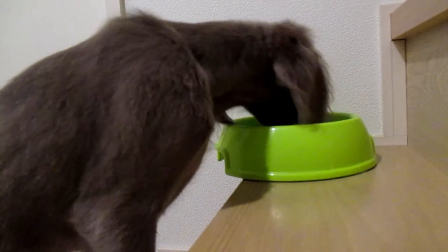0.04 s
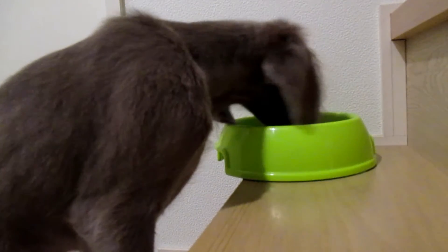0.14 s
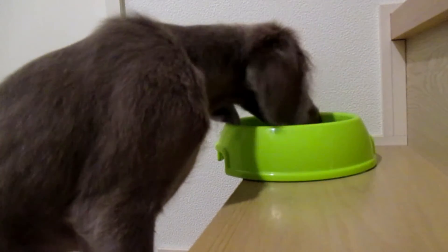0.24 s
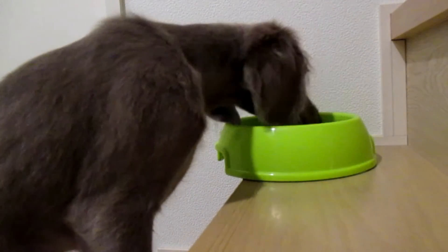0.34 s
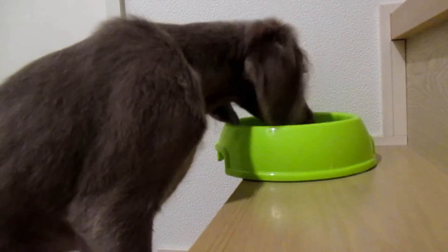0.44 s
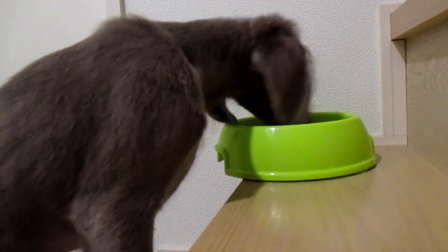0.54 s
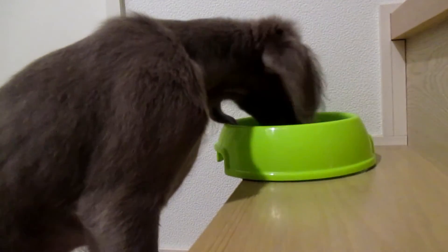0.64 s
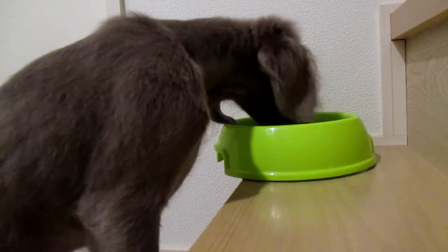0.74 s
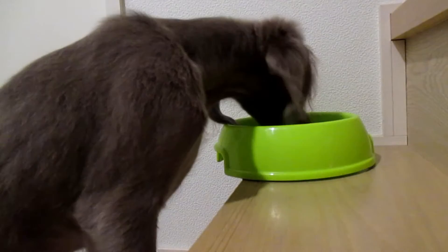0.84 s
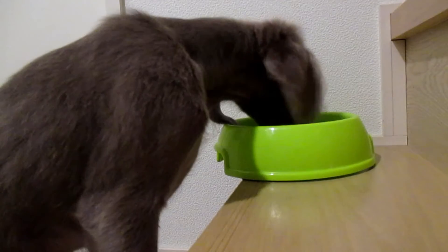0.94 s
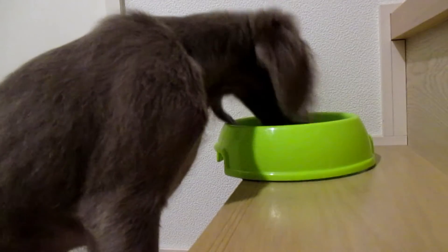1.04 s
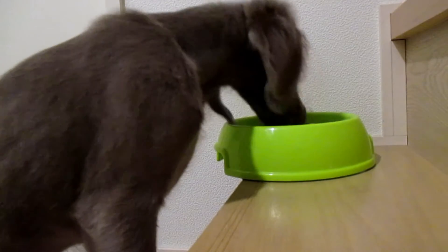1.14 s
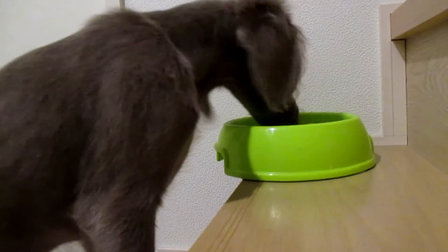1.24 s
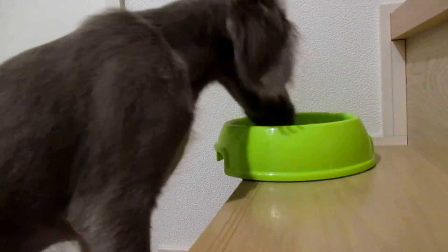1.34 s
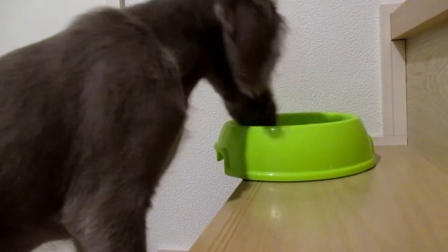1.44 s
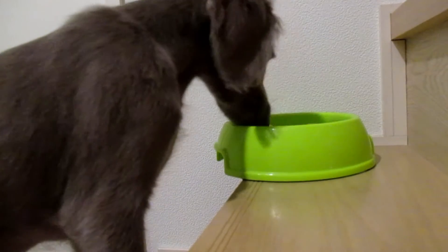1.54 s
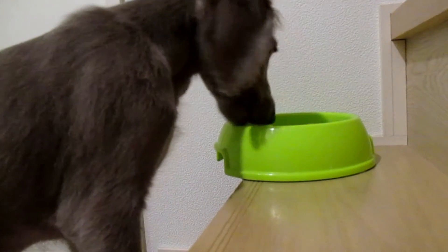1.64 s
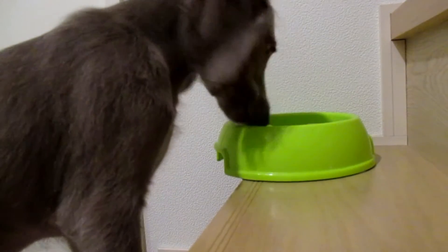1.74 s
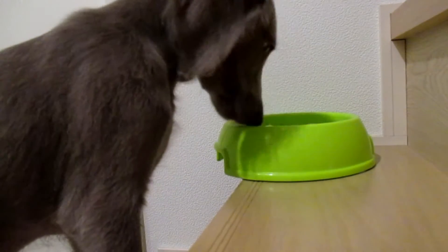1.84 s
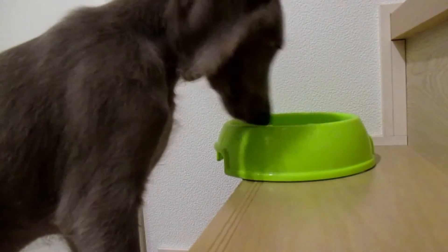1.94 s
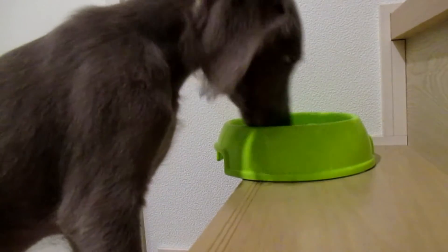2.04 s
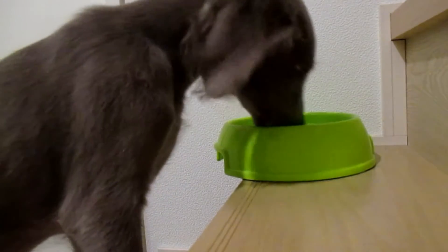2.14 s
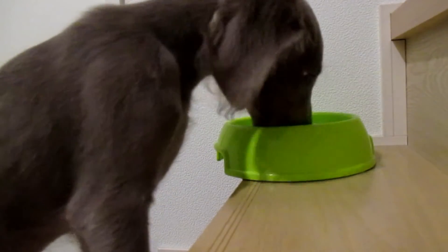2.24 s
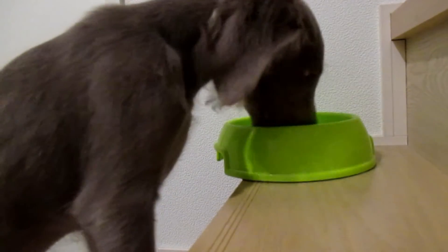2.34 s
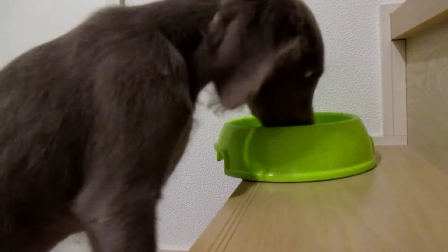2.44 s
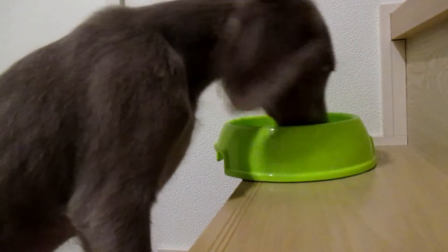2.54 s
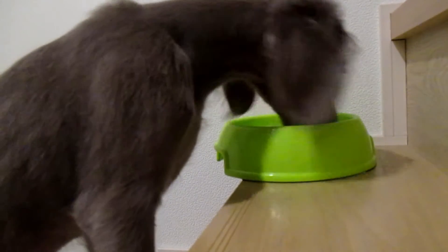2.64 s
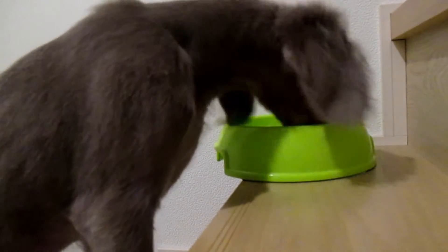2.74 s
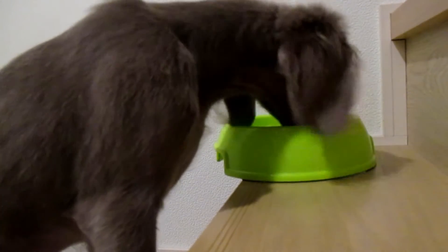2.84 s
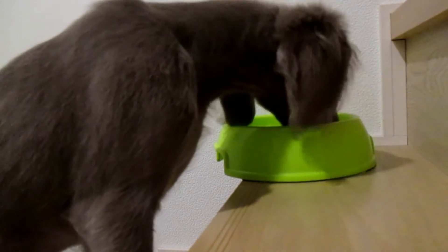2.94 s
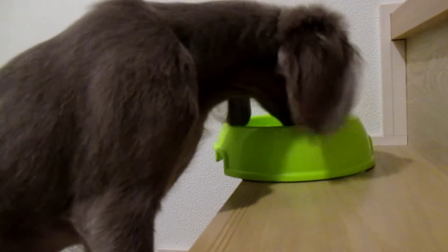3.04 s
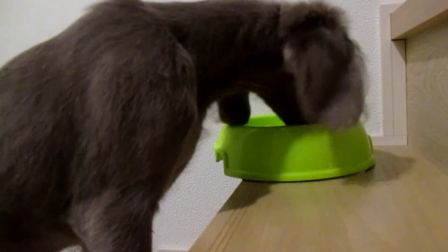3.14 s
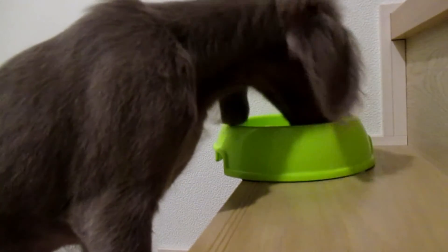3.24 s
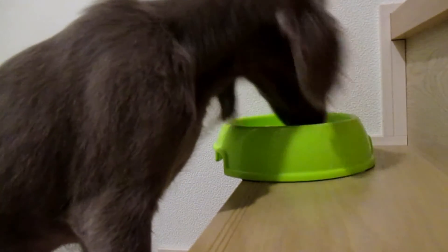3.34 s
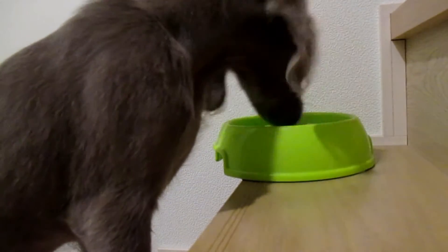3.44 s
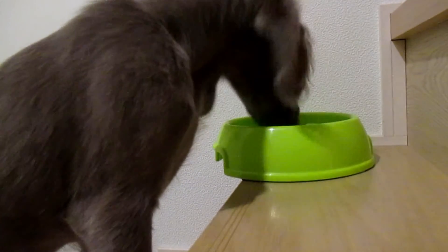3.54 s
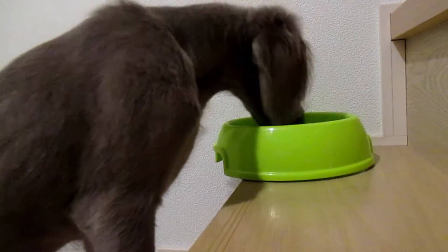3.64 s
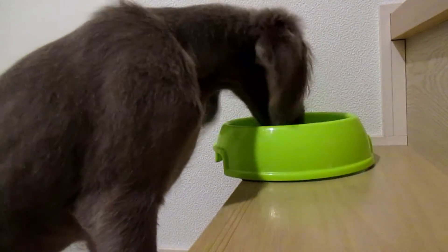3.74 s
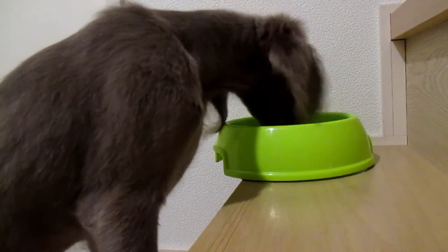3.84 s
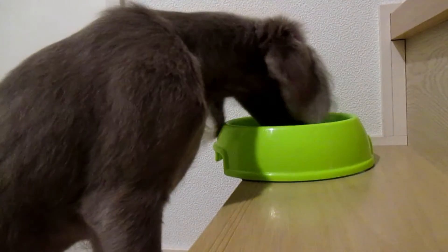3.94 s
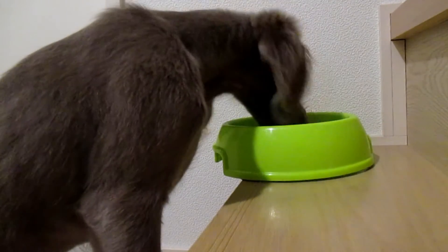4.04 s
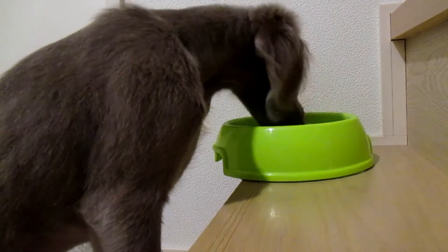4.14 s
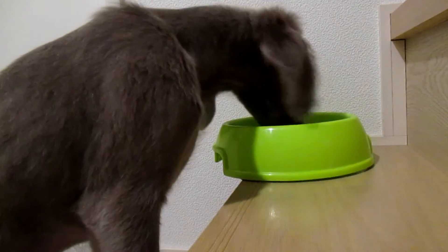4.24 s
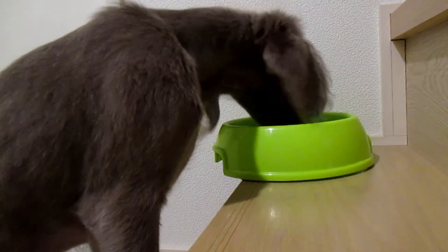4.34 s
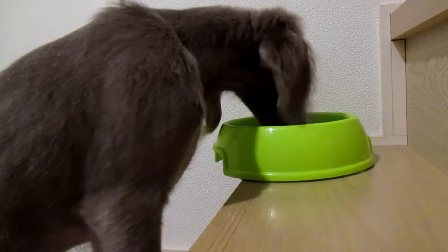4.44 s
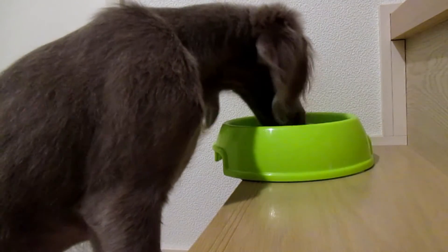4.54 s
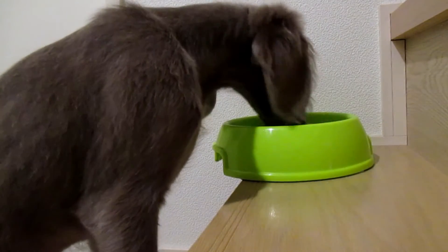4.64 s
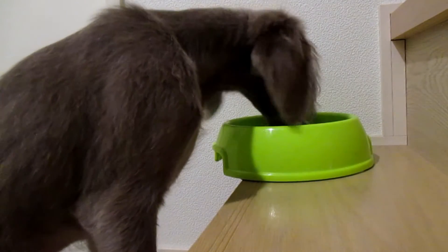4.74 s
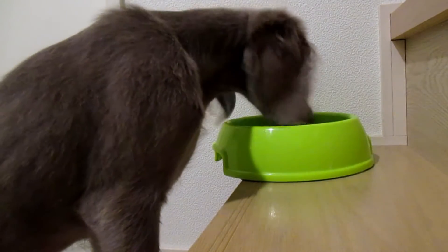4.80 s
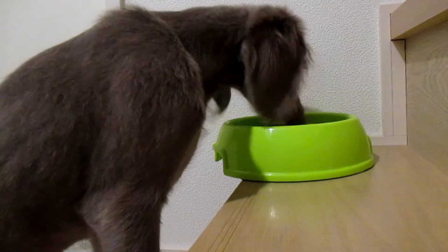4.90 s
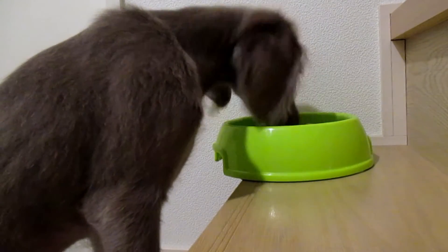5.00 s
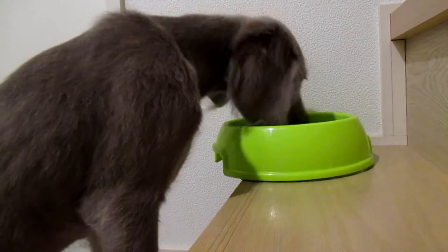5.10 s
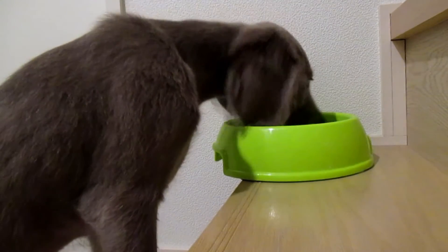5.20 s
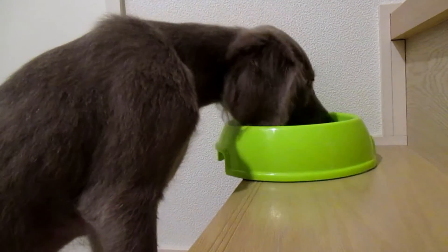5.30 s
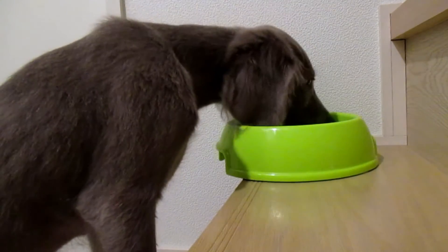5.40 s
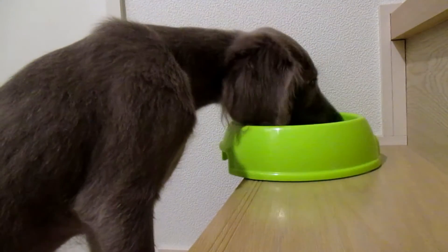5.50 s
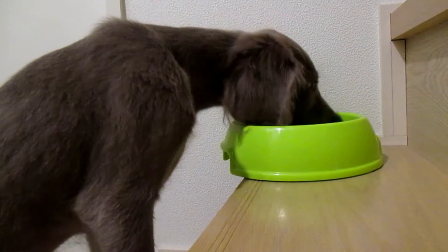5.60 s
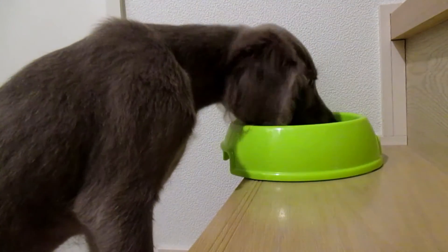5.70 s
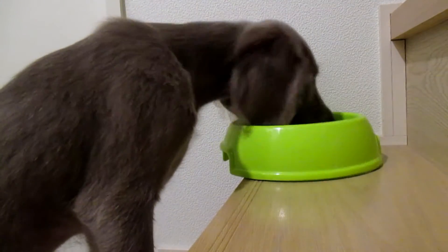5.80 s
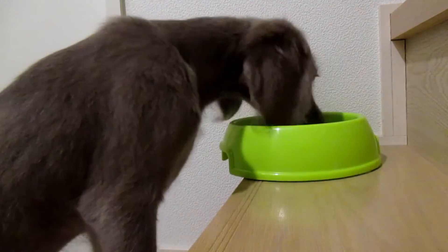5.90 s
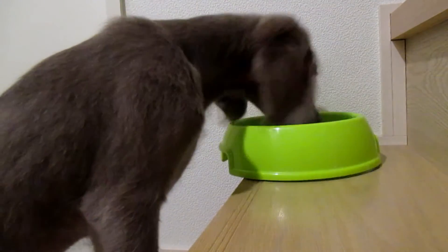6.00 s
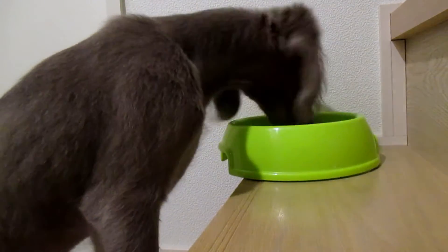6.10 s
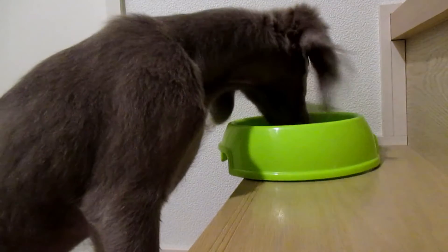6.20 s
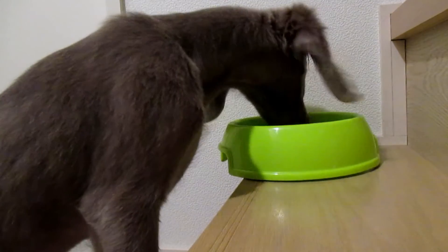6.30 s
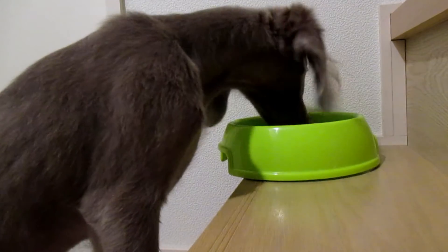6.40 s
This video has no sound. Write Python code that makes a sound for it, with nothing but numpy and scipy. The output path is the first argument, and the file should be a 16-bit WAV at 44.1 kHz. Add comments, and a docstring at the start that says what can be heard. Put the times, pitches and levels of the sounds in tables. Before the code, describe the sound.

Heard close in a small hard room, a dog noses through dry kibble, clacking pieces against a plastic bowl that knocks on wood. A quieter spell of soft tongue smacks follows, then a burst of loud brittle crunches, then more rummaging with isolated cracks and increasingly heavy hollow knocks. A low, soft indoor hum and faint hiss stay beneath.

```python
"""Dry kibble cracks between a dog's teeth: bursts of splinter noise, each with a pitch, answered by a small hard room.
The muzzle knocks a plastic bowl onto a wooden shelf and pieces clack on its wall: struck banks of decaying modes.
Tongue and lips smack as blurred pitches; loose pieces roll and patter as random taps through resonances.
A soft indoor hum of coloured noise lies beneath."""
import sys
import numpy as np
from scipy import signal
from scipy.fft import rfft, irfft, next_fast_len
from scipy.io import wavfile
from scipy.ndimage import uniform_filter1d

SR = 44100
rng = np.random.default_rng(int(sys.argv[2]) if len(sys.argv) > 2 else 0)


def store_pcm(level_fs):
    """Save levels as 16-bit WAV."""
    pcm = np.round(np.clip(level_fs, -1, 1) * 32767).astype(np.int16)
    wavfile.write(sys.argv[1], SR, np.atleast_2d(pcm).T)


N = 284886

# knocks of bowl on board, relative levels: start_s, level_db, deep_modes_db, upper_modes_db, ring_db
KNOCK_EVENTS = [(0.017, -31.5, -11.5, -7, -1.5), (0.23, -47, 7, -9, 1.5), (0.315, -34.5, 2.5, -6, -1.5),
                (0.401, -25.5, -19, -9, -8), (0.541, -16.5, -13, -10.5, -1), (0.589, -25.5, -9.5, -10, 2),
                (0.743, -21.5, -17.5, -10, 3.5), (0.799, -33, -18, -15, 3.5), (0.928, -25, -19, -12, 1),
                (0.968, -31, -6, -19, 3), (1.096, -20, -50, -13.5, -0.5), (1.162, -28, -5.5, -22, 6.5),
                (1.395, -31, 2.5, -9, -2), (1.805, -42, 5.5, -18, 0), (2.386, -33, 7, -7, 1),
                (2.423, -42, 1.5, 2, 8), (2.708, -38.5, 6.5, -4, 1.5), (2.841, -39, 8.5, 2, 1),
                (2.959, -32, -1, -16, 4.5), (3.031, -20.5, -1, -14, -1), (3.045, -27.5, -20, -17, 4.5),
                (3.303, -32.5, -1, -12, -1.5), (3.603, -28, -27, -15, -10.5), (3.694, -11, -26, -13, -4.5),
                (3.993, -15, -0.5, -9, 1.5), (4.009, -15, -14.5, -19, 2.5), (4.066, -15.5, -21, -19, 1),
                (4.326, -17, -42, -8.5, -3), (4.449, -23, -22, -17, -5), (4.633, -34.5, -1, 1, -3),
                (5.148, -9.5, -37, -9, -2), (5.268, -21, -5.5, -17, 3.5), (5.584, -22.5, -3.5, -8, 6),
                (5.613, -9.5, -6.5, -14.5, -1), (5.879, -5, -25, -3.5, -3), (5.921, -10.5, -0.5, -9, -4.5),
                (6.024, -22.5, -22, -13, -2), (6.07, -7.5, -16, -6, -4.5), (6.276, -21.5, -18, -9, 1.5)]
# modes of board and bowl together: pitch_hz, level_db, t60_s
BOARD_MODES = [(102, -8, .5), (130, -8, .5), (155, -2, .8), (186, -5, .4), (240, 0, .4), (278, -2, .4),
               (312, -5, .4), (371, -2, .38), (400, -7, .35), (428, -1, .38), (477, -1, .42),
               (515, -10, .3), (572, -6, .25), (601, -2, .25), (682, -9, .2), (742, -2, .4), (780, 0, .36),
               (824, -3, .3)]
# modes of the bowl wall: pitch_hz, level_db, t60_s
WALL_MODES = [(912, 0.5, 0.62), (995, 3, 0.28), (1095, 3, 0.13), (1128, -8, 0.73), (1213, -0.5, 0.15),
              (1310, 0.5, 0.22), (1395, -1.5, 0.22), (1522, -3.5, 0.38), (1565, 3, 0.12),
              (1674, -0.5, 0.29), (1846, -1.5, 0.18)]


def amp(db):
    """Gain of a level in dB."""
    return np.exp(np.asarray(db) * np.log(10) / 20)


def unit(x):
    """x at rms 1."""
    return x / np.sqrt(np.mean(x ** 2) + 1e-20)


def along(points, hz):
    """Interpolates (Hz, value) points on a log frequency axis."""
    point_hz, value = np.transpose(points)
    return np.interp(np.log(hz + 1), np.log(point_hz + 1), value)


def filtered(x, response):
    """x times a response of frequency, padded against wrap-around."""
    m = next_fast_len(N + SR // 2)
    return irfft(rfft(x, m) * response(np.fft.rfftfreq(m, 1 / SR)), m)[..., :N]


def add(track, start_s, sound):
    """Mixes a sound into the track at start_s."""
    part = track[round(start_s * SR):][:len(sound)]
    part += sound[:len(part)]


def struck(modes, gains_db, ring_db, thud_t60_s, attack_s, swell_s, knots_per_s, length_s):
    """One blow: each mode thuds, then its ring comes back off the walls with wandering strength and phase."""
    hz, db, t60_s = np.transpose(modes)[:, :, None]
    t = np.arange(round(length_s * SR)) / SR
    knots = rng.standard_normal((len(modes), 90)) + 1j * rng.standard_normal((len(modes), 90))
    knots = knots / np.sqrt(np.abs(knots))  # phase wanders freely, strength less
    wander = np.array([np.interp(t * knots_per_s, np.arange(len(k)), k) for k in knots])
    turn = np.exp(2j * np.pi * hz * t)
    thud = amp(-60 * t / thud_t60_s) * turn.imag
    swell = 1 - np.exp(-t / swell_s)
    ring = amp(ring_db - 60 * t / t60_s) * (turn * wander).imag * swell
    attack = (1 - np.exp(-t / attack_s)) ** 2
    return np.sum(amp(db + gains_db[:, None]) * (thud + ring), axis=0) * attack


def bite(f):
    """Colour of breaking kibble: a broad curve times resonances of the air inside the bowl."""
    # broad colour: pitch_hz, gain_db
    colour = [(1120, -14), (1900, -4.5), (2060, -14.5), (2410, 1), (3130, -1.5), (3390, -2), (4120, 0),
              (5170, -4), (7220, -12), (9150, -17.5), (15500, -38)]
    # air resonances: pitch_hz, half_width_hz, gain_db
    hollow = [(2630, 49, 2.5), (3010, 7.7, 10.5), (3360, 38, 7), (4650, 70, -0.5)]
    lifts = []
    for centre_hz, half_width_hz, db in hollow:
        damping = 2j * f * half_width_hz
        lifts.append(1 + (amp(db) - 1) * damping / (centre_hz ** 2 - f * f + damping))
    return amp(along(colour, f)) * np.prod(lifts, axis=0)


def cracks():
    """Each break is a few ms of splinters and a pitch of its own; the room's echo dies band by band."""
    # pieces that break or tick, relative levels: start_s, level_db, top_octave_db, pitch_hz, echo_db
    crack_events = [(0.0435, -35, -17, 3040, -33), (0.3177, -41.5, 2.5, 3640, -10),
                    (0.3486, -35, -12, 3080, -11), (0.3626, -36, -13, 2980, -25),
                    (0.404, -16, -21, 2680, -12.5), (0.4294, -19, -27, 2680, -17),
                    (0.5546, -26.5, -23.5, 3220, -9.5), (0.7223, -45.5, 3, 4170, -12),
                    (0.741, -30, -18, 2910, -17), (0.792, -31, -6, 2920, -12),
                    (0.8574, -30, -20, 2270, -17), (0.9401, -31, -9.5, 4170, -12.5),
                    (0.9933, -27, -22, 3420, -10.5), (1.1368, -43, -2, 2420, -12),
                    (1.1663, -28.5, -38, 2550, -25), (1.2381, -27.5, -20.5, 2480, -12.5),
                    (1.4408, -34, -9.5, 3730, -14.5), (1.6182, -41.5, 1, 3200, -14),
                    (1.706, -41, -13, 4670, -7), (1.722, -38, -4, 2420, -14),
                    (2.2104, -40.5, -3, 2960, -13), (2.2324, -42, 0, 2870, -18),
                    (2.2458, -43, 6, 5350, -17), (2.2886, -19, -20, 4300, -9.5),
                    (2.3304, -35, -4, 4270, -13), (2.385, -15.5, -23, 3720, -13),
                    (2.4126, -17, -17, 3720, -13), (2.4385, -21.5, -22, 4650, -19),
                    (2.4769, -11.5, -28.5, 4060, -15.5), (2.5073, -23.5, -14.5, 3140, -11),
                    (2.613, -35, -19, 3710, -6), (2.6504, -38.5, -11, 4280, -5),
                    (2.6938, -13, -26, 2590, -19), (2.698, -5.5, -12.5, 4650, -13),
                    (2.7617, -15.5, -22, 3940, -12), (2.7942, -1.5, -16.5, 3220, -12),
                    (2.8205, -24, -12, 3030, -21), (2.9489, -5, -12, 2550, -13),
                    (3.044, -16, -37, 3640, -11), (3.0583, -17, -29, 2630, -12),
                    (3.1113, -14, -32, 3980, -11.5), (3.2766, -20, -31, 2910, -14),
                    (3.5858, -41.5, -6, 4310, -12), (3.605, -36, -18, 2730, -13),
                    (3.694, -30.5, -18, 2470, -23), (3.7858, -37.5, -16, 2630, -15),
                    (3.864, -30.5, -13, 3300, -10.5), (3.9015, -15, -36, 3300, -17),
                    (3.9693, -24.5, -21, 2780, -16), (3.9943, -32, -28, 2280, -5),
                    (4.0677, -34, -12, 2700, -9.5), (4.1415, -53.5, 13, 3460, -16),
                    (4.2348, -32.5, -4, 4870, -9), (4.2533, -5, -20.5, 2940, -11.5),
                    (4.431, -37, -22, 2400, -6), (4.5523, -37.5, -7, 5280, -13),
                    (4.7814, -46, -10, 2480, -2), (4.7985, -36, -25, 3620, -15),
                    (5.089, -60, 13, 2410, -18), (5.149, -36, -36, 2730, -13),
                    (5.2716, -38.5, -14, 3340, -2), (5.3149, -32.5, -17, 3270, -1),
                    (5.4875, -33, -17, 3480, -10), (5.5144, -35, -16, 3430, -4),
                    (5.5551, -16.5, -12, 3160, -8.5), (5.743, -29, -24, 3420, -18),
                    (5.819, -33, -25, 4160, -17), (5.878, -28, -28, 2250, -11),
                    (5.896, -30, -18.5, 3360, -8), (5.929, -18, -35, 3140, -16),
                    (5.9945, -12, -45, 3060, -19), (6.0214, -22.5, -42, 2830, -12),
                    (6.1324, -39.5, -2, 2740, -17), (6.285, -37, -12, 2590, -12.5),
                    (6.3924, -28.5, -22, 2950, -29)]
    # echo bands: centre_hz, t60_s
    echo_bands = [(3200, 0.39), (5500, 0.36), (8500, 0.37), (12500, 0.14)]
    ring_db, ring_per_top = -24, 0.28  # dull cracks ring more: dB gained per dB of top octave lost
    noise_db = -1.5
    t = np.arange(round(.4 * SR)) / SR
    burst_t = t[:2000]
    burst_power, echo_power = np.zeros((len(echo_bands), N)), np.zeros((len(echo_bands), N))
    pings = np.zeros(N)
    for s, db, top_db, hz, echo_db in crack_events:
        for k, (centre_hz, t60_s) in enumerate(echo_bands):
            level_db = db + (top_db + 21 if centre_hz > 6000 else 0)
            burst = amp(level_db - 60 * burst_t / 0.026) ** 2 * (1 - np.exp(-burst_t / 0.00009))
            echo = amp(level_db + echo_db - 60 * t / t60_s) ** 2 * (1 - np.exp(-t / 0.0047))
            add(burst_power[k], s, burst)
            add(echo_power[k], s, echo)
        ping = struck([(hz, -6, .3)], np.array([db]), ring_db - ring_per_top * top_db, thud_t60_s=0.027,
                      attack_s=0.00053, swell_s=0.0054, knots_per_s=417, length_s=0.28)
        add(pings, s, ping)
    # uneven single fractures, 3500 a second
    splinters = unit((rng.random(N) < 3500 / SR) * amp(3.5 * rng.standard_normal(N)))
    # echo strength flickers over about 3 ms
    flutter = amp(1.6 * unit(uniform_filter1d(rng.standard_normal(N), size=130)))
    centres_hz = np.transpose(echo_bands)[0]
    out = pings
    for k in range(len(echo_bands)):
        in_band = np.arange(len(echo_bands)) == k
        share = lambda f: np.sqrt(np.interp(f, centres_hz, in_band)) * bite(f)
        strength = np.sqrt(burst_power[k]) * splinters + np.sqrt(echo_power[k]) * flutter
        out = out + amp(noise_db) * filtered(strength * rng.standard_normal(N), share)
    return out


def board():
    """Knocks of bowl on board: landing spot sets the share of deep modes, the deepest grow slowly with force."""
    deepest_db, deepest_growth = -25, 0.35  # level at a -27.5 dB knock, dB per dB of knock
    trim_db = -5.5
    out, hz = np.zeros(N), np.transpose(BOARD_MODES)[0]
    swell_s = np.where(hz > 700, .035, .007)[:, None]  # the highest modes build up after the blow
    for s, db, deep_db, upper_db, ring_db in KNOCK_EVENTS:
        deepest = deepest_db + deepest_growth * (db + 27.5)
        gains_db = np.select([hz < 210, hz < 330, hz > 545], [deepest, db + deep_db + 4, db + upper_db], db)
        knock = struck(BOARD_MODES, gains_db, ring_db, thud_t60_s=0.034, attack_s=0.00055,
                       swell_s=swell_s, knots_per_s=20.2, length_s=0.26)
        add(out, s, amp(trim_db) * knock)
    # a small board radiates no deep bass
    return filtered(out, lambda f: (1j * f / (85 + 1j * f)) ** 2)


def wall():
    """Clacks of hard pieces on the plastic: each lifts the wall modes near its favoured pitch."""
    # pieces that hit the wall, relative levels: start_s, level_db, favoured_pitch_hz, ring_db
    clack_events = [(0.042, -32, 990, -22), (0.318, -34.5, 1030, -6), (0.351, -27.5, 1570, -12),
                    (0.403, -8.5, 837, -9.5), (0.541, -30, 1560, -3.5), (0.742, -16.5, 1250, -14),
                    (0.793, -25, 820, -9), (0.85, -23.5, 1640, -14), (0.946, -31, 1000, -11),
                    (0.993, -33, 1110, -8), (1.141, -32.5, 1630, -14), (1.236, -22, 1160, -14),
                    (1.281, -33, 1010, -12), (1.444, -32.5, 1170, -14), (1.533, -39, 896, -9),
                    (2.29, -19.5, 1370, -11), (2.389, -28, 1840, 1.5), (2.699, -28, 1770, -2.5),
                    (2.76, -20, 1080, -21), (2.793, -20.5, 1044, -5), (2.953, -26, 1290, -8),
                    (3.044, -25.5, 1060, -4), (3.111, -25.5, 1570, -9.5), (3.22, -36.5, 1550, -6),
                    (3.272, -30, 1720, -3.5), (3.602, -30, 1150, 0.5), (3.694, -23.5, 870, -13),
                    (3.898, -32, 1860, -4), (3.992, -24, 1180, -4.5), (4.066, -17.5, 934, -12.5),
                    (4.12, -40, 860, -9), (4.253, -19, 1240, -7), (4.33, -25.5, 890, -8),
                    (4.379, -29.5, 884, -11), (4.43, -29, 1830, -8), (5.151, -20.5, 1540, -7.5),
                    (5.206, -29, 890, -10), (5.488, -37, 886, -9), (5.517, -26, 890, -11),
                    (5.556, -26.5, 1530, -13), (5.587, -25, 1050, -16), (5.611, -31.5, 890, 1),
                    (5.665, -33, 872, -18), (5.881, -10.5, 1080, -6), (5.992, -19.5, 940, -14),
                    (6.07, -17, 960, -9), (6.128, -39, 890, -8), (6.212, -40, 940, -4),
                    (6.39, -26.5, 960, -24)]
    favour_db, favour_half_width_hz = 9.5, 55
    trim_db = -11.5
    out, hz = np.zeros(N), np.transpose(WALL_MODES)[0]
    for s, db, favoured_hz, ring_db in clack_events:
        gains_db = db + favour_db / (1 + ((hz - favoured_hz) / favour_half_width_hz) ** 2)
        clack = struck(WALL_MODES, gains_db, ring_db, thud_t60_s=0.038, attack_s=0.00053,
                       swell_s=0.00045, knots_per_s=89.6, length_s=.3)
        add(out, s, amp(trim_db) * clack)
    return filtered(out, lambda f: (1j * f / (500 + 1j * f)) ** 2)


def smacks():
    """Soft wet smacks of tongue and lips: the mouth cavity sounds briefly as a blurred pitch."""
    # smacks, relative levels: start_s, level_db, pitch_hz
    smack_events = [(1.375, -37.5, 1770), (1.534, -43.5, 1720), (1.6563, -41, 1730), (1.7502, -38, 1630),
                    (2.2172, -34.5, 1685), (4.5516, -38, 1690), (4.7889, -43, 1710), (4.8216, -30, 1727),
                    (5.7984, -48, 1640), (6.2158, -36, 1520)]
    t60_s = 0.17
    out = np.zeros(N)
    for s, db, hz in smack_events:
        smack = struck([(hz, -3, t60_s)], np.array([db]), -0.71, thud_t60_s=0.043, attack_s=0.0007,
                       swell_s=0.0044, knots_per_s=343, length_s=.25)
        add(out, s, smack)
    return out


def rolling(modes, per_second, spread_db):
    """Sparse random taps through the resonances of an object, rms 1."""
    taps = (rng.random(N) < per_second / SR) * amp(spread_db * rng.standard_normal(N)) * rng.standard_normal(N)

    def body(f):
        """Sum of resonances with alternating sign."""
        total = 0
        for k, (centre_hz, db, t60_s) in enumerate(modes):
            damping = 1j * f * 7.7 / t60_s  # 3.5 times the width that t60_s alone gives
            total = total + (-1) ** k * amp(db) * damping / (centre_hz ** 2 - f * f + damping)
        return total

    return unit(filtered(taps, body))


def stir():
    """Loose pieces roll under the tongue on wall and board, crumbs patter, the bowl chatters after knocks."""
    # loose kibble rolling along the wall: time_s, level_db
    roll_levels = [(0.0, -64), (0.32, -57), (0.5, -48), (1.35, -51.5), (1.94, -89), (2.23, -55.5),
                   (2.39, -43), (3.0, -52), (3.44, -58.5), (3.65, -66), (3.78, -51), (4.25, -65),
                   (4.95, -55), (5.18, -71), (5.34, -51.5), (6.08, -47.5), (6.37, -56), (6.46, -73)]
    # patter of crumbs: time_s, level_db
    crumb_levels = [(0.0, -53.5), (0.36, -90), (0.5, -56), (0.59, -57.5), (1.89, -71), (2.27, -69),
                    (2.45, -60), (2.75, -64), (2.88, -51), (3.0, -46), (3.38, -65), (4.39, -58),
                    (4.89, -72), (5.2, -67), (5.49, -66), (5.99, -55.5), (6.15, -63), (6.46, -80)]
    board_db = -9.5  # rolling heard through the board, relative to the wall
    chatter_db, chatter_peak_s = -24.5, 0.043  # relative to the knock's table level; time to its height
    t = np.arange(N) / SR
    level = lambda rows: amp(np.interp(t, *np.transpose(rows)))
    ticks = (rng.random(N) < 1500 / SR) * amp(1.5 * rng.standard_normal(N)) * rng.standard_normal(N)
    crumbs = unit(filtered(ticks, bite))
    board_level = amp(board_db) * level(roll_levels)
    u = t[:SR // 2] / chatter_peak_s
    for s, db, *_ in KNOCK_EVENTS:
        add(board_level, s, amp(db + chatter_db) * u * np.exp(1 - u))
    on_wall = level(roll_levels) * rolling(WALL_MODES, per_second=900, spread_db=8)
    on_board = board_level * rolling(BOARD_MODES, per_second=200, spread_db=3.5)
    return on_wall + level(crumb_levels) * crumbs + on_board


def hum():
    """Steady sound of the house and hiss of the microphone: one coloured noise."""
    # noise colour: pitch_hz, relative_db
    hum_colour = [(12, -45), (20, -10), (74, -6.5), (93, -8), (122, -4), (252, -15.5), (333, -12),
                  (373, -9), (405, -15), (536, -21.5), (2040, -30), (2850, -35), (5880, -40.5),
                  (11800, -41), (15600, -57)]
    rms_db = -48
    noise = filtered(rng.standard_normal(N), lambda f: amp(along(hum_colour, f)))
    return amp(rms_db) * unit(noise)


def scene():
    """Both channels are nearly alike: the right is slightly louder, near walls add a faint unlike part."""
    sound = cracks() + board() + wall() + smacks() + stir() + hum()
    t = np.arange(SR // 10) / SR
    walls = amp(-60 * t / .05) * rng.standard_normal(len(t))
    unlike = signal.fftconvolve(sound, walls / np.linalg.norm(walls))[:N]
    width_db = [(60, -48.0), (300, -66.5), (1200, -40.0), (8000, -43), (14000, -23.0)]  # pitch_hz, side_db
    side = filtered(unlike - amp(1.0) * sound, lambda f: amp(along(width_db, f)))
    return np.array([sound + side, sound - side])


def record(dry):
    """The input stage rounds off the highest peaks; nothing remains above the band limit."""
    top_hz = 15750
    rounded = dry / (1 + np.abs(dry / .85) ** 4) ** (1 / 4)
    return filtered(rounded, lambda hz: hz < top_hz)


dry = scene()
out = record(dry)
store_pcm(out)
```